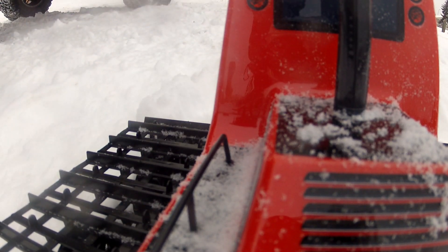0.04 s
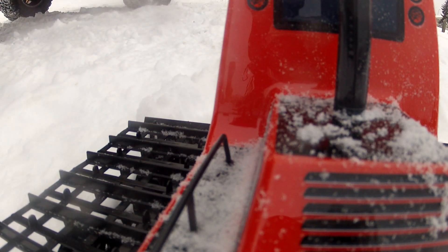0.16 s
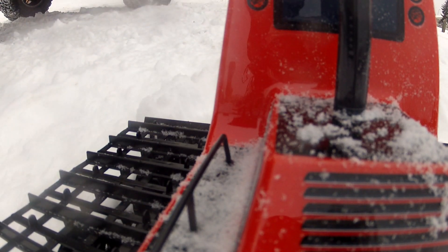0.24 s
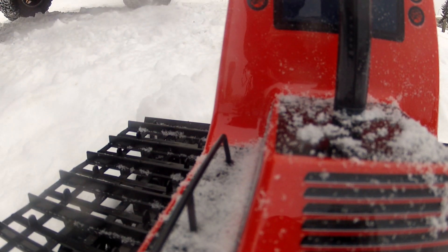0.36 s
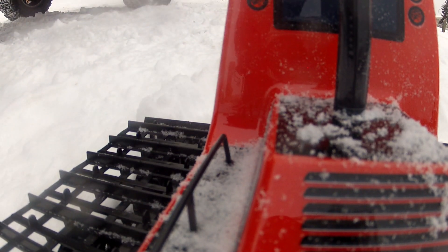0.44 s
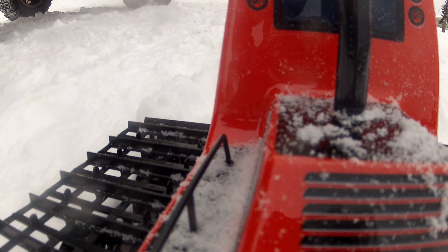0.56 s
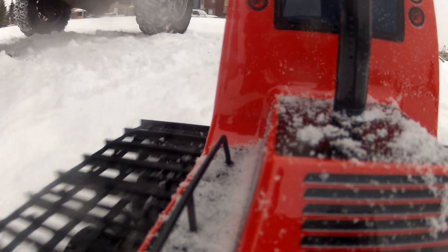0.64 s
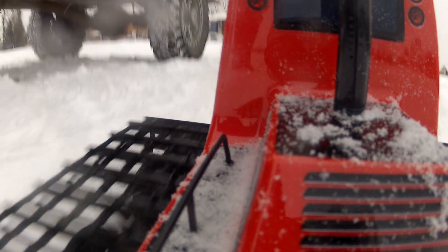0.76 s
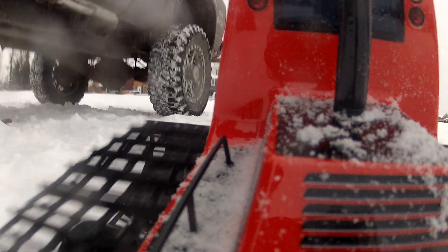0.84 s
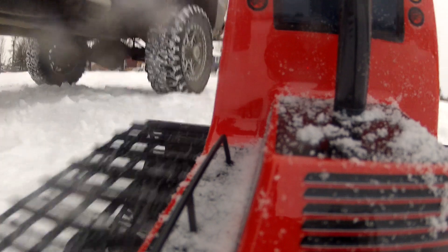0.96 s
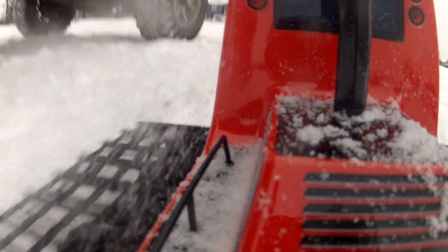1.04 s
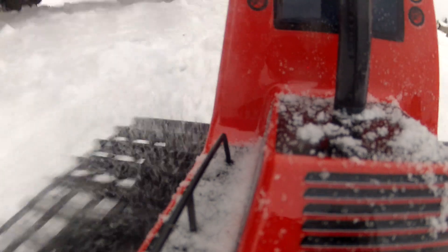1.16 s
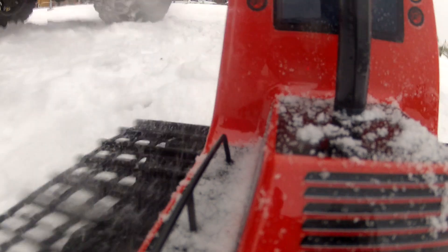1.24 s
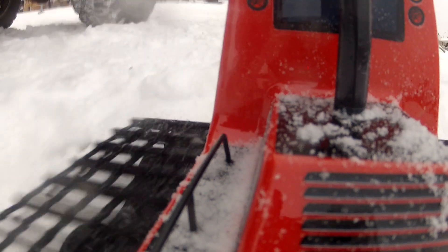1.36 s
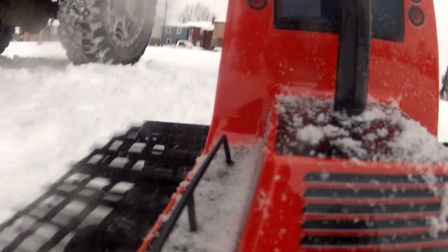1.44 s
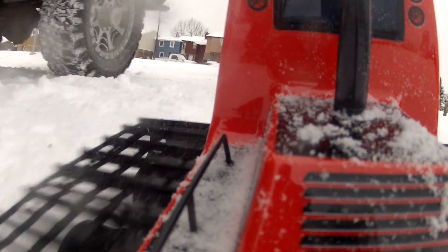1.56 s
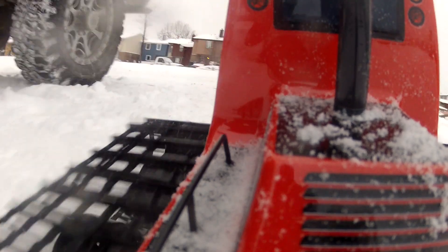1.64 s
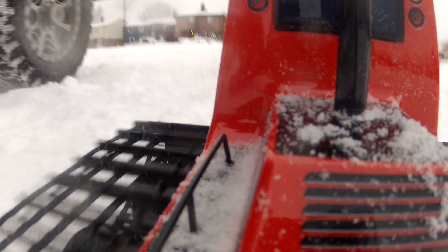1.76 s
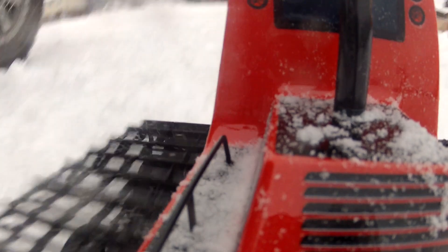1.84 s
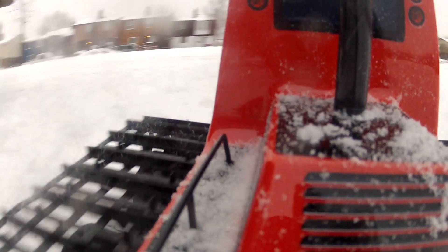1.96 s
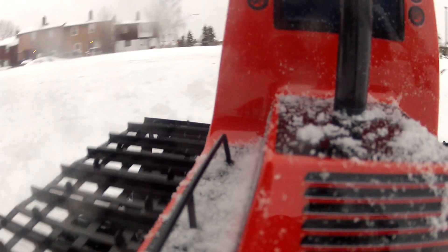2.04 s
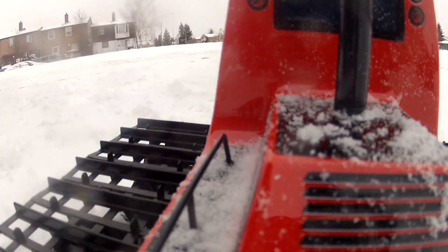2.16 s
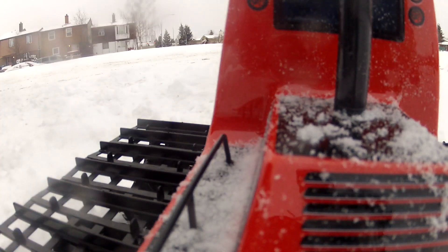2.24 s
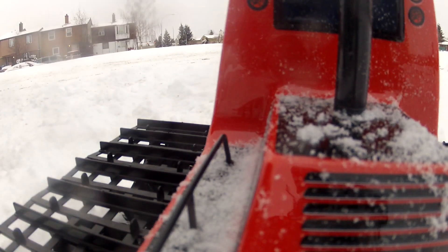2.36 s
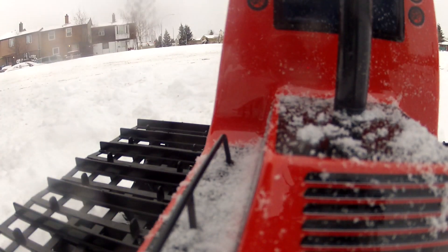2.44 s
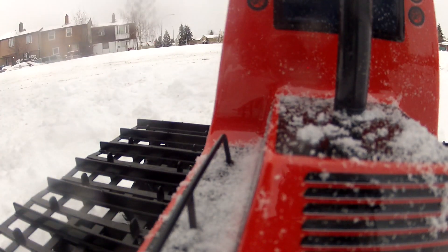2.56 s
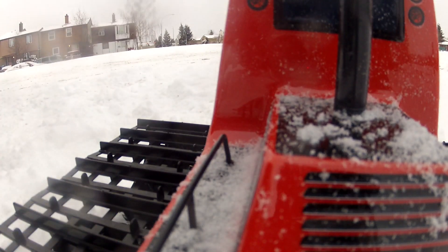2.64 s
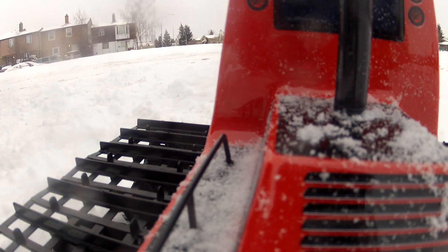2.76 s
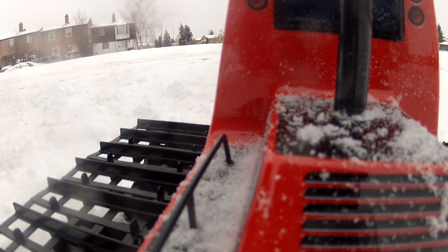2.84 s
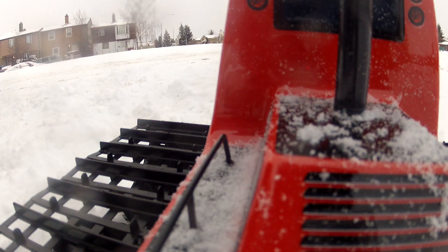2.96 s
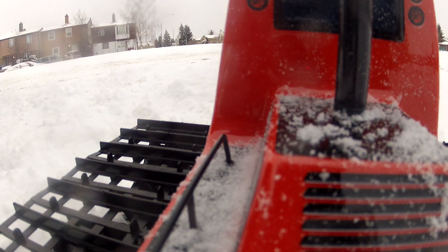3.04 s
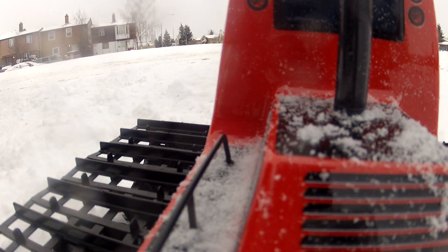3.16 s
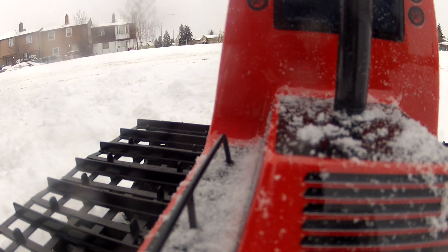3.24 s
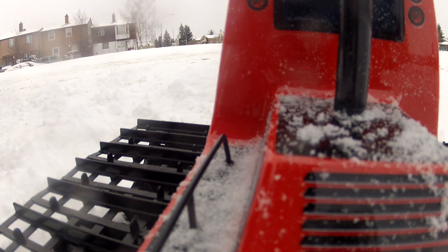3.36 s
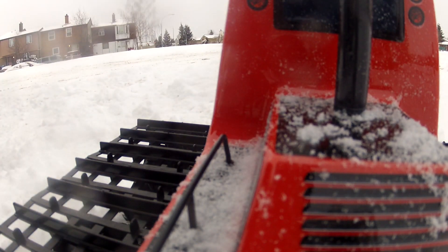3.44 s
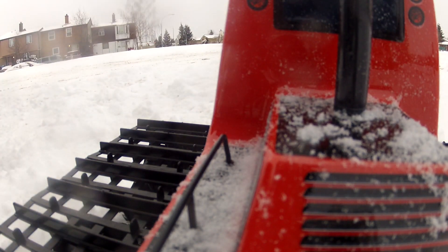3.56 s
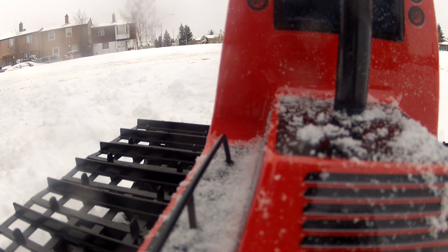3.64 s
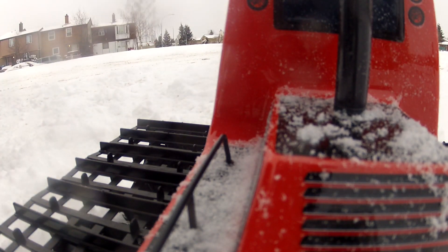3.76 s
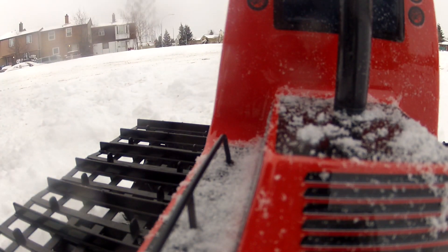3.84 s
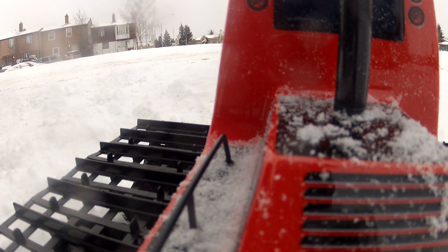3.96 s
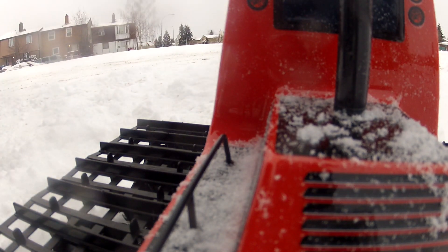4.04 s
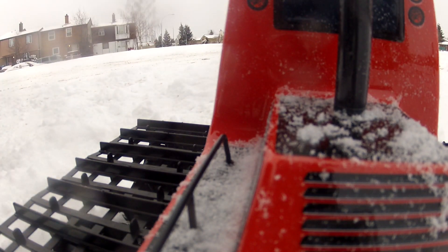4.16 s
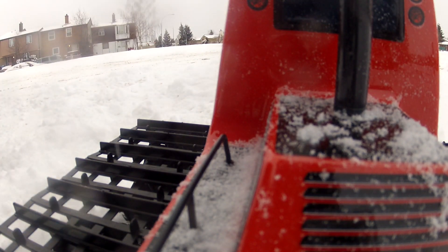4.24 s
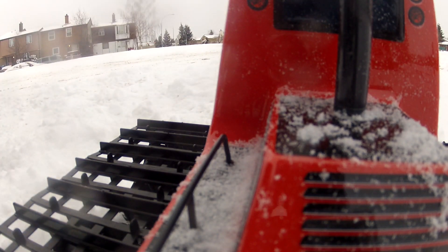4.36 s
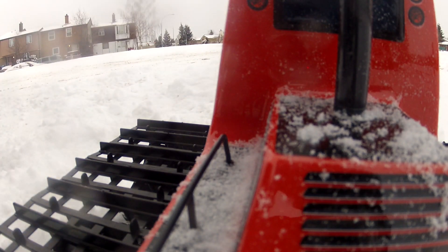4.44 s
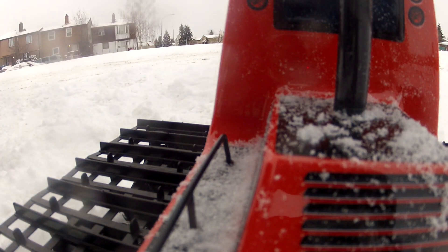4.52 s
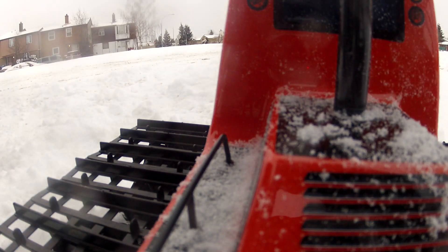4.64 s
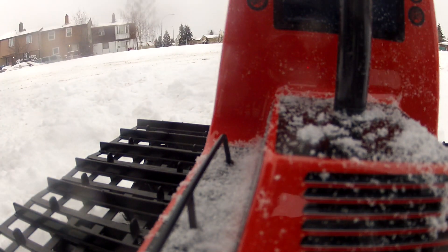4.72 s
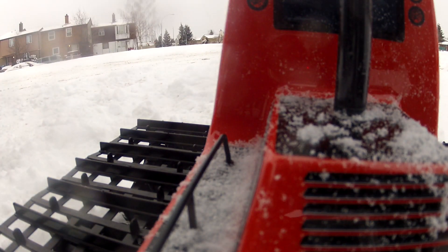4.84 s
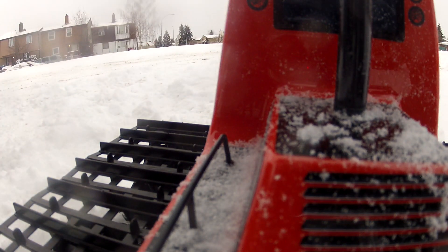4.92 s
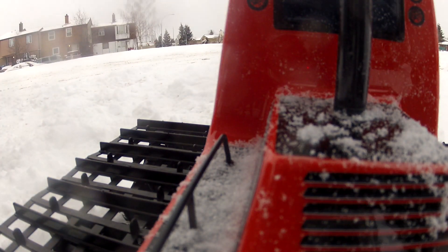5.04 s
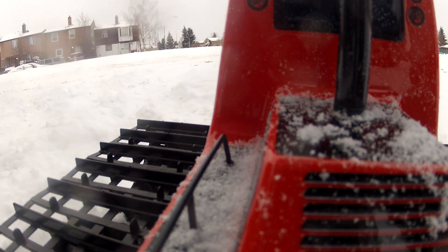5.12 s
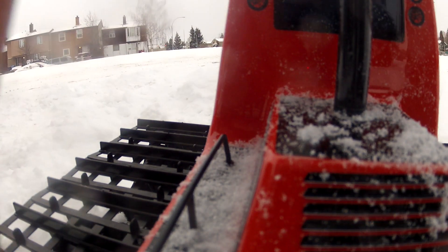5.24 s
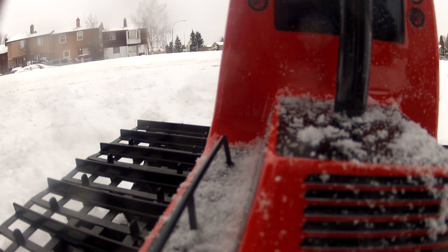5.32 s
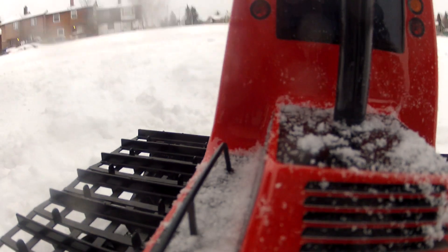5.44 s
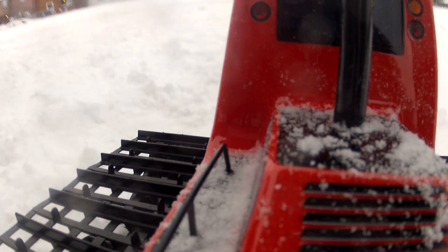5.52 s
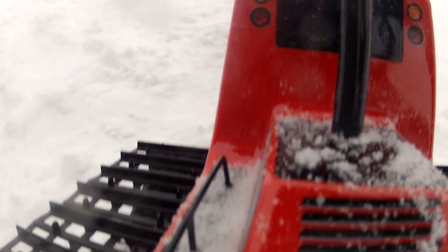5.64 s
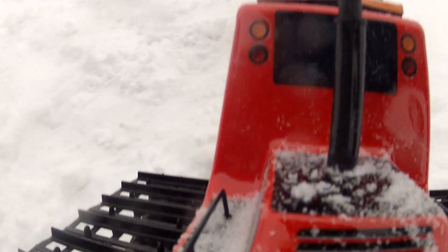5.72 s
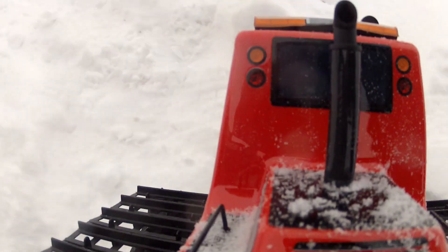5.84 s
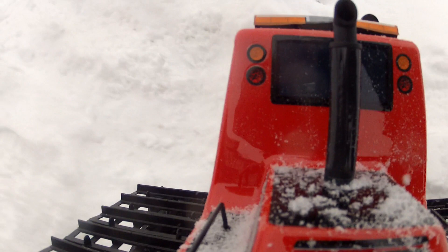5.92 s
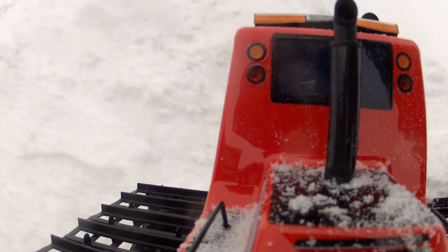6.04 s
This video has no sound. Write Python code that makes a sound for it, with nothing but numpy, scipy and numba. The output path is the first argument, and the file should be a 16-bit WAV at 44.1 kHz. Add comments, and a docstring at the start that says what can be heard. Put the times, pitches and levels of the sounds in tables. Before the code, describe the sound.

Heard very close from the deck of a toy tracked vehicle on a quiet snowfield, an electric whine climbs over plastic rattling and a low rumble, with two sharp track snaps. The run ends and a few seconds of near silence follow, dotted with tiny clicks. The motor briefly whines again, more softly, under rough scrapes and hard knocks from the plastic camera case, the last knock the loudest. The treble sounds gritty.

```python
"""Toy snowcat in the snow

A small radio-controlled snowcat, heard from a camera on its deck. It drives for a second and a half:
gears whine, the cleats (ribs on the tracks) slap the wheels, and the tracks rattle the plastic body.
It rests and twitches, then creeps off while the camera case scrapes round on its mount and knocks hard.
The camera samples the sound coarsely, which makes the treble gritty."""
import sys
import numpy as np
from scipy import signal
from scipy.fft import rfft, irfft
from scipy.io import wavfile
from scipy.ndimage import uniform_filter1d
from numba import njit

SR = 44100
rng = np.random.default_rng(int(sys.argv[2]) if len(sys.argv) > 2 else 0)


def int16_out(signal):
    """Quantize to a 16-bit WAV file."""
    q = np.round(np.clip(np.atleast_2d(signal).T, -1, 1) * 32767)
    wavfile.write(sys.argv[1], SR, q.astype(np.int16))


N = 268392
TIME = np.arange(N) / SR
ROCK_HZ, ROCK_T60_S = 43.54, .35  # the chassis on its springs; T60 is the time to fade by 60 dB

# Tone of still winter air and microphone hiss: (frequency [Hz], relative level [dB])
AIR_TONE = [(15, -38.5), (25, -9), (85, -6.5), (192, -5.5), (323, -9.5), (595, -16.5), (781, -17.5),
            (1150, -22.5), (1260, -23), (5600, -27.5), (7280, -63.5), (12300, -120)]
# Tone of the rumbling deck: (frequency [Hz], relative level [dB])
DECK_TONE = [(25, -24), (45, -4.5), (90, -2), (125, -4.5), (175, -6), (240, -12.5), (320, -19),
             (600, -46.5)]
# Tone of the plastic body: (frequency [Hz], relative level [dB])
BODY_TONE = [(180, -35.5), (320, -19), (560, -12.5), (900, -9), (1080, -9.5), (1350, -10), (1950, -8.5),
             (2300, -13), (2780, -12.5), (3050, -25.5), (3550, -19.5), (4100, -32), (4600, -27.5),
             (5600, -35.5)]
# Pitches at which the body rings: (frequency [Hz], width [Hz], relative level [dB])
BODY_RINGS = [(575, 31, -5), (923, 83, -7), (1193, 36, -1), (1338, 140, 5.5), (1705, 120, 0.5),
              (1950, 55, -5), (2579, 29, -12)]
# Tone of scrapes, creaks and cracks: (frequency [Hz], relative level [dB])
SCRAPE_TONE = [(180, -31), (300, -9.5), (560, -9.5), (760, -8.5), (1080, -4), (1500, -1), (2300, -1),
               (3000, -5.5), (3700, -0.5), (4100, -10.5), (5000, -6), (5600, -12.5)]
# The tracks stirring faintly at rest: (time [s], length [s], level [dB])
TRACK_STIRS = [(3.56, 0.14, -69.5), (3.79, 0.19, -65.5), (4.1, 0.045, -68.5), (4.3, 0.225, -66),
               (4.84, .035, -57)]
# The motor straining without turning the tracks: (time [s], length [s], level [dB])
MOTOR_STRAINS = [(.448, 0.029, -59.5), (4.995, 0.12973, -51)]
# How hard the camera case rubs on its mount: (time [s], level [dB])
CASE_RUB = [(5.243, -16.5), (5.295, -31.5), (5.35, -21.5), (5.49, -34), (5.55, -21.5), (5.61, -27),
            (5.665, -17), (5.74, -30.5), (5.86, -41), (6.0, -33), (6.085, -38.5)]
# The case hitting its mount: (time [s], ring [dB], favoured pitch [Hz], crack [dB], deck thump [dB])
CASE_KNOCKS = [ (3.401, -71, 2000, -52, -76), (4.53, -68.5, 2000, -49.5, -82),
               (5.2422, -26, 2900, -10.5, -53), (5.265, -4.5, 1380, -2, -32),
               (5.3009, -25, 2000, -14.5, -42), (5.473, -20.5, 1300, -42, -41), (5.5, -18, 600, -25, -49),
               (5.7096, -8.5, 1450, -32, -44), (5.737, -15, 1400, -14.5, -17), (5.7473, 1, 1196, -7.5, 6),
               (5.8256, 2.5, 1930, -7.5, -32), (5.8656, -19, 1700, -44, -60), (5.884, -12, 1500, -42, -56),
               (5.896, 16.5, 840, 5.5, 5.5)]
# Pitches at which the case rings: (frequency [Hz], time to fade by 60 dB [s], relative level [dB])
CASE_RINGS = [(456, 0.009, -4.5), (830, 0.012, -6), (1123, 0.028, -7.5), (1299, 0.016, 1),
              (1600, 0.0063, 0), (2013, 0.014, -3.5), (2600, 0.0027, -10), (3880, 0.01, -20)]
# The tracks snapping against their wheels: (time [s], level [dB], ring pitch [Hz], rocking [dB])
TRACK_SNAPS = [(.449, -42.5, 2860, -48), (1.214, 4.5, 1428, -35), (1.958, -6, 457, -13),
               (2.276, -34.5, 1900, -42), (2.304, -35, 1410, -51), (2.327, -34.5, 1370, -46),
               (3.7405, -34, 686, -67.5), (3.772, -25.5, 1343, -42), (3.788, -27, 1027, -36),
               (3.869, -39.5, 1790, -75), (5.057, -40.5, 2750, -60), (5.527, -12.5, 2286, -48)]
# Bursts of throttle: (start [s], rise [s], easing from [s], stop [s], easing rate [dB/s],
# rattle [dB], whine [dB], deck rumble [dB], rocking [dB])
THROTTLE_BURSTS = [(0.628, .014, 1.874, 2.232, 30, -17, -20.5, -22, -28.5),
                   (5.135, 0.0053, 5.22, 5.74, 47, -36.5, -28, -34, -39)]
# How often gear teeth meet in the first run, following track speed: (time [s], tooth rate [Hz])
GEAR_SPEED = [(.63, 640), (.745, 800), (.8, 912), (.88, 1228), (1.02, 1212), (1.22, 1352), (1.42, 1448),
              (1.62, 1337), (1.81, 1295), (1.9, 1410), (2.24, 1263)]
# Tones of the gears: (pitch [multiple of the tooth rate], relative level [dB])
GEAR_TONES = [(.62, -11), (0.99, 0.93), (0.93, -10), (4 / 3, -7.5), (1.6, -8.5), (2, -1.7), (3, -0.84)]


def undb(db):
    """Turn decibels into a gain to multiply by."""
    return 10 ** (np.asarray(db) / 20)


def unit(x):
    """Scale a signal to an average (rms) level of 1."""
    return x / np.sqrt(np.mean(x ** 2))


def curve(rows):
    """Join (time, value) points with straight lines."""
    return np.interp(TIME, *np.transpose(rows))


def colour(x, tone):
    """Give a sound the tone in a table, at an average level of 1."""
    hz, db = np.transpose(tone)
    log_hz = np.log(np.fft.rfftfreq(N, 1 / SR) + 1)
    log_gain = np.log(undb(np.interp(log_hz, np.log(hz), db)))
    cepstrum = irfft(log_gain, N)
    cepstrum[N // 2:] = 0  # so the filter rings after each click, never before
    return unit(irfft(rfft(x) * np.exp(2 * rfft(cepstrum)), N))


def resonate(x, hz, width_hz):
    """Keep a narrow band of sound around one pitch."""
    return signal.lfilter(*signal.iirpeak(hz, hz / width_hz, fs=SR), x)


def ring(t, hz, t60):
    """A struck tone that fades by 60 dB in t60 seconds."""
    return np.sin(2 * np.pi * hz * t) * np.exp(-np.log(1000) * t / t60)


def wander(per_s):
    """A random drift around zero, roughly 1 either way."""
    points = rng.standard_normal(8192)
    return np.interp(TIME * per_s, np.arange(len(points)), points)


def clicks(per_s, spread_db):
    """Tiny random impacts of uneven size."""
    hits = (rng.random(N) < per_s / SR) * rng.choice([-1, 1], N)
    return unit(hits * undb(spread_db * rng.standard_normal(N)))


def bursts(rows):
    """A gain that turns on softly for each (time, length, level) row."""
    gates = sum(undb(db) * (TIME > start) * (TIME < start + length) for start, length, db in rows)
    return uniform_filter1d(gates, size=700)


def envelope(start, rise_s, stop, fall_db_per_s):
    """A gain that rises, holds, then fades."""
    return np.clip((TIME - start) / rise_s, 0, 1) * undb(-fall_db_per_s * np.maximum(TIME - stop, 0))


def add(out, time_s, sound):
    """Mix a sound in at the given time."""
    start = int(time_s * SR)
    out[start:start + len(sound)] += sound[:N - start]


@njit
def follow_peaks(x, attack, release):
    """Follow a sound's level: quick to rise, slow to fall."""
    out, level = np.empty(len(x)), 0.
    for i in range(len(x)):
        level += (abs(x[i]) - level) * (attack if abs(x[i]) > level else release)
        out[i] = level
    return out


def plastic_body(force, rings_db=-2):
    """The shaken shell sounds over a wide range, with a few pitches standing out."""
    broad = colour(force, BODY_TONE)
    rings = sum(undb(db) * resonate(broad, hz, width) for hz, width, db in BODY_RINGS)
    return unit(broad + undb(rings_db) * unit(rings))


def winter_air(level_db=-63):
    """Still air and microphone hiss make a faint, steady noise."""
    return undb(level_db) * colour(rng.standard_normal(N), AIR_TONE)


def resting_stirs(buzz_hz=2850, width_hz=450):
    """At rest the tracks creak in the snow, and the barely powered motor buzzes and chatters."""
    deck = undb(-1) * colour(clicks(600, 4), DECK_TONE)
    creak = colour(clicks(1200, 2.45) * undb(3.9 * wander(40)), SCRAPE_TONE)
    ticks = resonate(clicks(1500, 6.6), buzz_hz, width_hz)
    buzz = undb(-3.5) * unit(resonate(ticks, buzz_hz, width_hz))
    chatter = undb(-3) * plastic_body(clicks(1500, 2.8))
    return (creak + deck) * bursts(TRACK_STIRS) + (buzz + chatter + deck) * bursts(MOTOR_STRAINS)


def case_scrape(patchy_db=2.54, rumble_db=-36):
    """The camera case sticks and slips on its mount, and the deck rumbles under it."""
    start = CASE_RUB[0][0]
    slips = clicks(9000, 3) * undb(patchy_db * wander(59))
    scrape = colour(slips, SCRAPE_TONE) * undb(curve(CASE_RUB)) * (TIME > start)
    rumble = undb(rumble_db) * colour(clicks(900, 2.1), DECK_TONE)
    return scrape + rumble * envelope(start, rise_s=.014, stop=5.88, fall_db_per_s=35)


def case_knocks(focus_db_per_octave=6, detune=.032, crack_s=.0035, contact_s=.00044):
    """Each blow cracks, thumps the deck and rings the case; where it lands favours some pitches."""
    out, t = np.zeros(N), TIME[:SR // 2]
    shudder = colour(rng.standard_normal(N), DECK_TONE)[:len(t)] * np.exp(-t / .041)
    thump = ring(t, hz=152.6, t60=.045) + undb(-24) * shudder
    grit = colour(rng.standard_normal(N), SCRAPE_TONE)
    for time_s, ring_db, favoured_hz, crack_db, thump_db in CASE_KNOCKS:
        case = 0
        for k, (hz, t60, db) in enumerate(CASE_RINGS):
            weight = undb(db - focus_db_per_octave * abs(np.log2(hz / favoured_hz)))
            detuned_hz = hz * (1 + detune * rng.standard_normal())
            case += (-1) ** k * weight * ring(t, detuned_hz, t60)
        crack = np.roll(grit, -int(time_s * SR))[:len(t)] * np.exp(-t / crack_s)
        blow = undb(ring_db) * case / np.abs(case).max() + undb(crack_db) * crack - undb(thump_db) * thump
        add(out, time_s, blow * (1 - np.exp(-t / contact_s)))
    return out


def throttle(coast_s=.088, coast_db=-28, cut_db_per_s=1100, surge_db=1.21):
    """Gains for rattle, whine, rumble and rocking as the motor pulls, eases off and stops."""
    gains = 0
    for start, rise_s, ease_from, stop, ease_db_per_s, *levels_db in THROTTLE_BURSTS:
        eased_db = -ease_db_per_s * np.maximum(TIME - ease_from, 0)
        coast = undb(coast_db) * envelope(start, rise_s, stop + coast_s, cut_db_per_s)
        tracks = (envelope(start, rise_s, stop, cut_db_per_s) + coast) * undb(eased_db)
        # the deck and chassis settle more slowly than the tracks
        deck = envelope(start, rise_s, stop, fall_db_per_s=156) * undb(.47 * eased_db)
        rock = envelope(start, rise_s, stop, fall_db_per_s=125)
        gains += undb(levels_db)[:, None] * np.array([tracks, tracks, deck, rock])
    return gains * undb(surge_db * wander(16))  # uneven snow varies the load


def chassis_rock(gain, lumps_db=4, lurch_db=7, brake_at_s=2.21, lurch_width_s=.03984):
    """Lumps in the snow keep the chassis rocking on its springs; it lurches as it brakes."""
    cycles = ROCK_HZ * TIME + .22 * wander(14)
    rock = unit(np.sin(2 * np.pi * cycles) * undb(lumps_db * wander(14)))
    lurch = np.exp(-((TIME - brake_at_s) / lurch_width_s) ** 2)
    return rock * gain * undb(lurch_db * lurch)


def track_snaps(onset_s=.00041, decay_s=.0052):
    """A snapping track rattles the body, rings one panel, shakes the deck and rocks the chassis."""
    out, t = np.zeros(N), TIME[:SR // 2]
    rattle = undb(-6) * plastic_body(rng.standard_normal(N))
    deck = undb(-9) * colour(rng.standard_normal(N), DECK_TONE)[:len(t)] * np.exp(-t / .03)
    rocking = deck - ring(t, ROCK_HZ, ROCK_T60_S)
    onset = 1 - np.exp(-t / onset_s)  # each snap starts with a slightly softened edge
    for time_s, db, hz, rock_db in TRACK_SNAPS:
        burst = np.roll(rattle, -int(time_s * SR))[:len(t)] * np.exp(-t / decay_s)
        panel = undb(-2) * ring(t, hz, t60=1.1 * np.log(1000) * decay_s)
        add(out, time_s, undb(db) * onset * (burst + panel) + undb(rock_db) * rocking)
    return out


def level_dip(start_s=1.225, drop_db=5, recover_s=.15):
    """The driving sound ducks after the hardest snap as the camera turns itself down, then recovers."""
    return undb(-drop_db * (TIME > start_s) * np.exp(-np.abs(TIME - start_s) / recover_s))


def gear_whine(teeth, slap, shake=.34, waver_db=4, grit=.8, gearbox_hz=2600):
    """Gear tones waver with their load, roughened by loose teeth and shaken by the cleats."""
    tones = 0
    for multiple, db in GEAR_TONES:
        tone = np.sin(2 * np.pi * (multiple * teeth + .1 * wander(170)))
        tones += undb(db + waver_db * wander(30)) * tone * (1 + grit * wander(240))
    gearbox = signal.butter(6, gearbox_hz, fs=SR, output="sos")  # the closed box muffles high tones
    muffled = signal.sosfilt(gearbox, tones * (1 + shake * slap))
    whine = colour(muffled, BODY_TONE)
    return whine / np.sqrt(uniform_filter1d(whine ** 2, size=8000))  # even out slow level changes


def drive(rattle_gain, whine_gain, rumble_gain, creep_from_s=5, creep_hz=1084, teeth_per_cleat=14.6):
    """Gears whine; each cleat slaps a wheel, shaking the deck and rattling the loose track."""
    tooth_hz = np.where(TIME < creep_from_s, curve(GEAR_SPEED), creep_hz * (1 + .04 * wander(18)))
    flutter = 1 + .016 * wander(130)
    teeth = np.cumsum(tooth_hz * flutter) / SR  # how many teeth have met so far
    cleats = teeth / teeth_per_cleat
    slap = np.exp(-(cleats % 1)) * undb(2.6 * wander(90))
    rattle = plastic_body(clicks(4500, 3.3) * (1 + slap))
    hum = undb(-5) * unit(np.sin(2 * np.pi * cleats) * undb(6.2 * wander(12)))
    deck = colour(clicks(900, 1.7), DECK_TONE)
    rumble = unit((deck + hum) * undb(2 * wander(17)))
    whine = gear_whine(teeth, slap) * (tooth_hz / 1300) ** .45  # louder with speed
    return level_dip() * (whine * whine_gain + rattle * rattle_gain + rumble * rumble_gain)


def scene():
    """The snowcat and the camera case on a quiet snowfield, in one channel."""
    air = winter_air()
    rattle_gain, whine_gain, rumble_gain, rock_gain = throttle()
    driving = drive(rattle_gain, whine_gain, rumble_gain)
    snowcat = driving + chassis_rock(rock_gain) + resting_stirs() + track_snaps()
    return (air + case_scrape() + case_knocks() + snowcat)[None]


def record(dry, ceiling=.35, attack_s=.005, release_s=.32, camera_hz=12000):
    """The camera turns itself down after hard blows, and its coarse samples add a gritty treble."""
    peaks = follow_peaks(dry[0], 1 / (attack_s * SR), 1 / (release_s * SR))
    limited = np.clip(dry * ceiling / np.maximum(peaks, ceiling), -1, 1)
    dulled = signal.sosfilt(signal.butter(12, 5650, fs=SR, output="sos"), limited)
    coarse = np.clip(signal.resample_poly(dulled, camera_hz, SR, axis=1), -.9, .9)
    # holding each sample makes steps, which mirror the sound up into the treble
    held = signal.resample_poly(np.repeat(coarse, 4, axis=1), SR, 4 * camera_hz, axis=1)[:, :N]
    top_cut = signal.ellip(8, .1, 60, 15400, fs=SR, output="sos")
    return signal.sosfiltfilt(top_cut, held)


dry = scene()
out = record(dry)
int16_out(out)
```